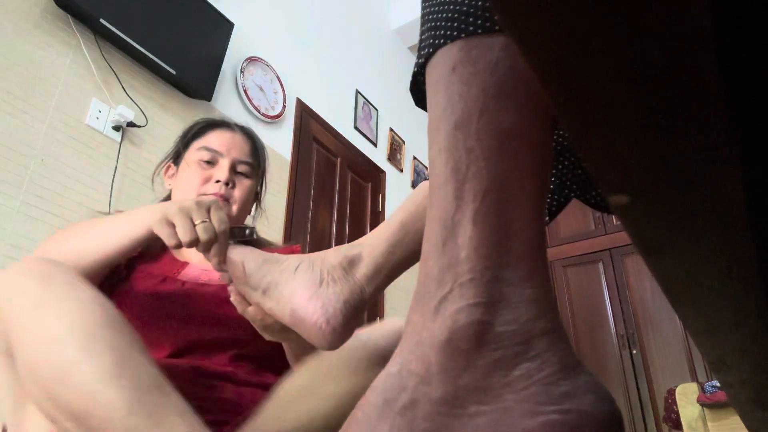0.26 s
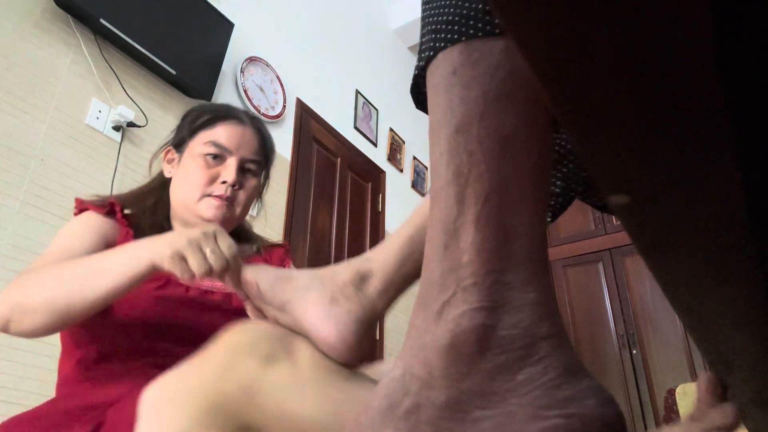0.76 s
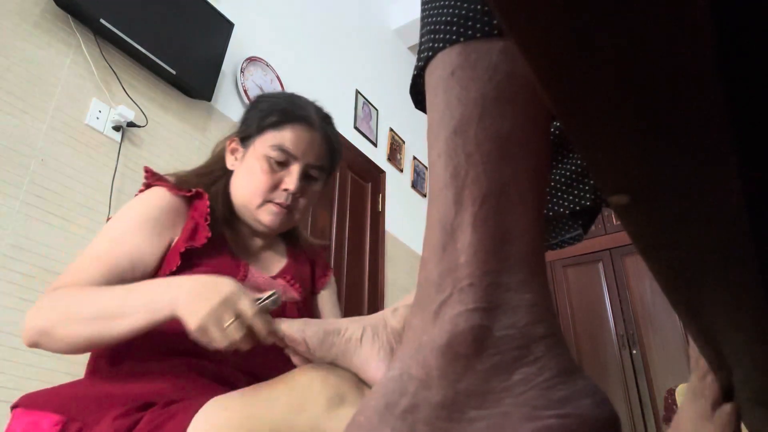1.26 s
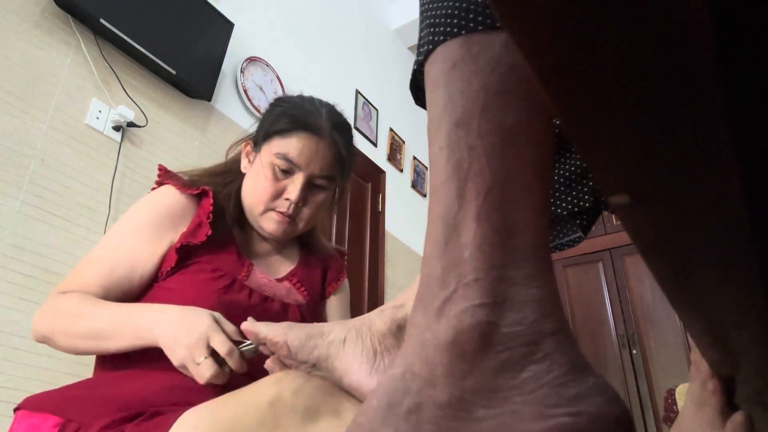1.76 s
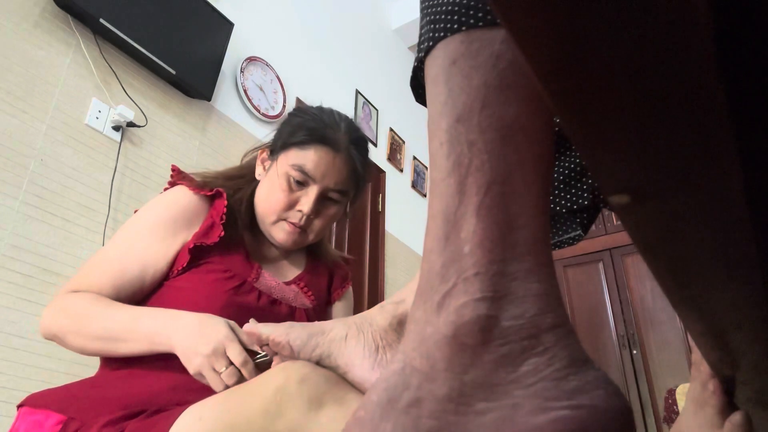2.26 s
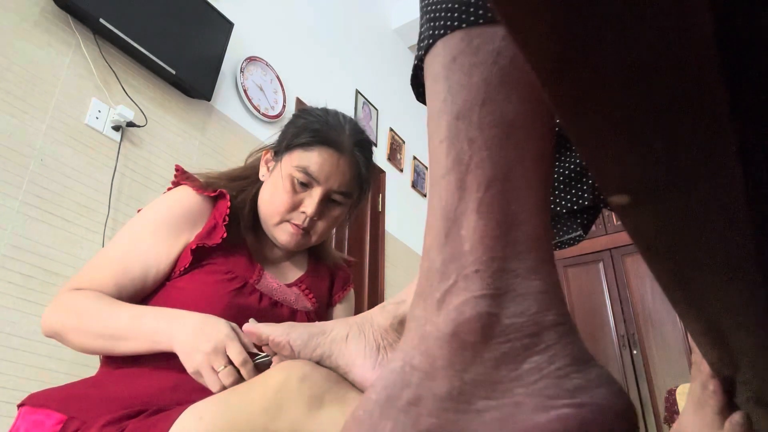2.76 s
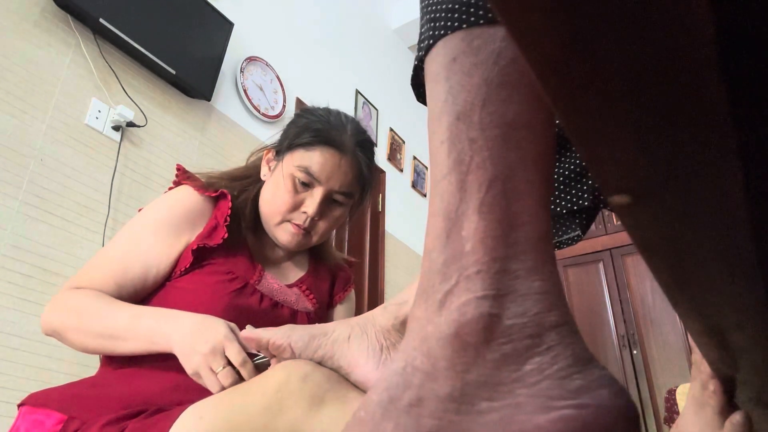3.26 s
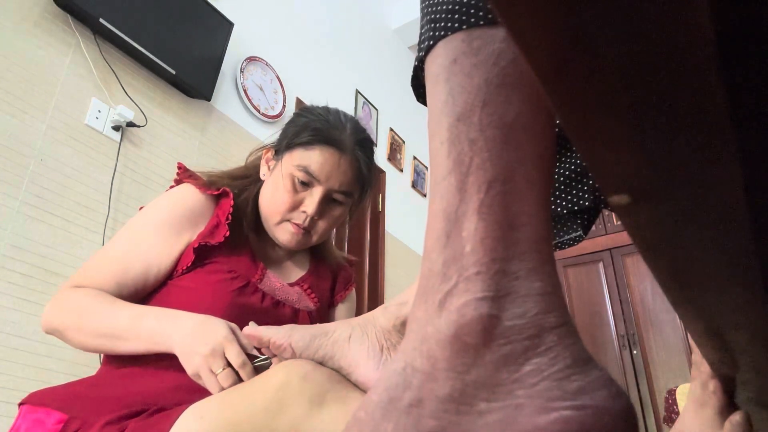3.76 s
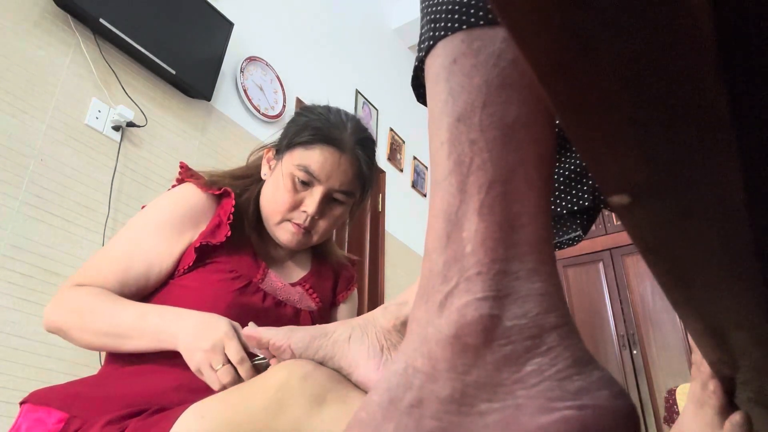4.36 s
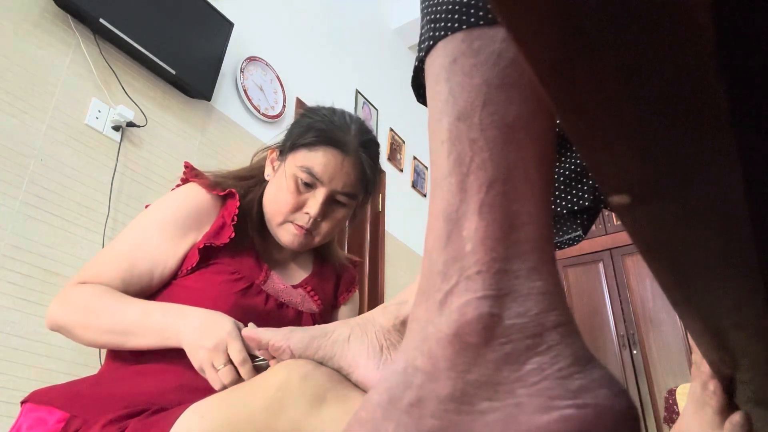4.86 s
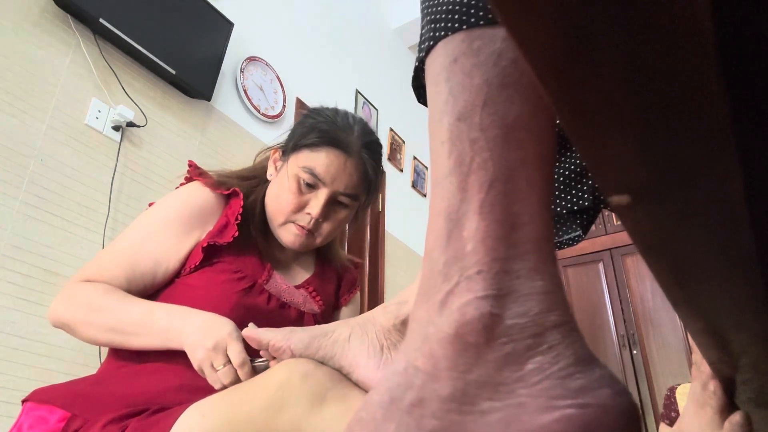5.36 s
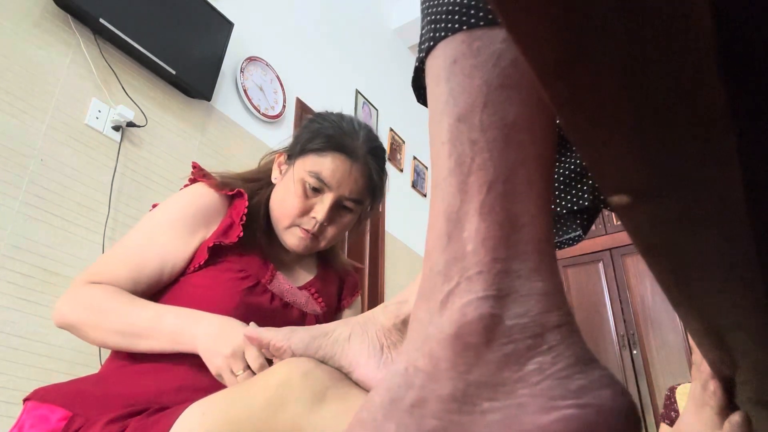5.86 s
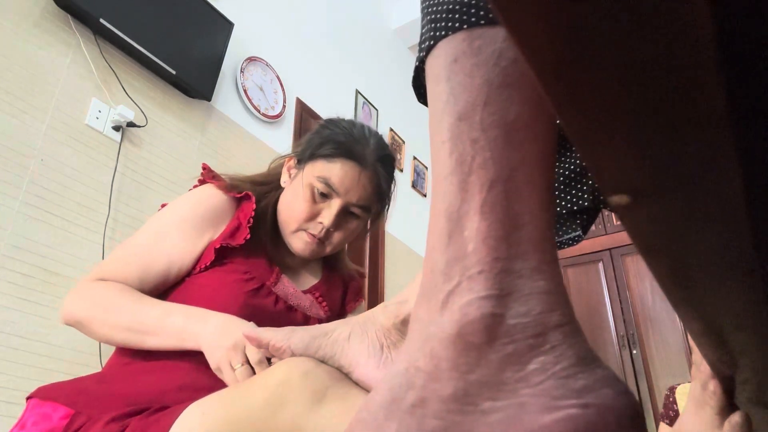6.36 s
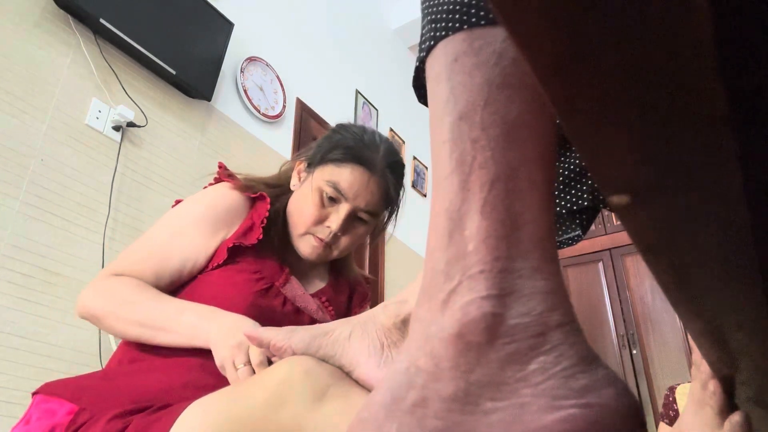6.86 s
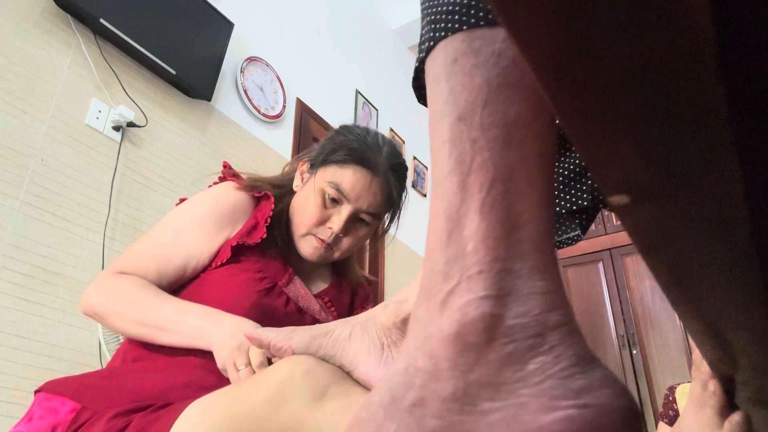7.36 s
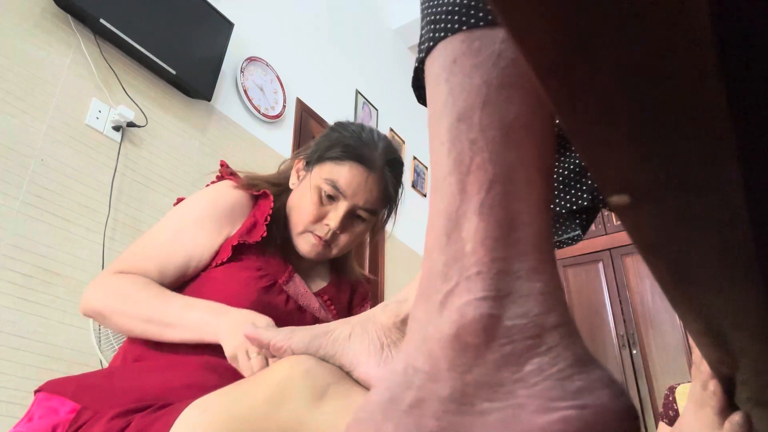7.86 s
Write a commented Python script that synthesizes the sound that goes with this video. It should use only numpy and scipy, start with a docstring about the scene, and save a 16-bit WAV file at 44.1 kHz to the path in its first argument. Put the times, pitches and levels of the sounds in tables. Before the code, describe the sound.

Cloth rustles briefly over a quiet fan and far traffic drone; later a single hard, high metallic toenail snip cracks, with a short bright echo.

```python
"""Toenail clipping in a tiled room

One snap: the clipper snip is a set of decaying modes, the nail cracks as a noise burst, the ring returns
once, faintly, and the room echoes as decaying noise. A fan hums (wavering sines) and blows (shaped noise);
far engines drone through the walls (gliding sines). A dress rustles at first, lifting the treble; one tiny
tick. A limiter ducks the snap, and the echo follows."""
import sys
import numpy as np
from scipy import signal
from scipy.fft import rfft, irfft, next_fast_len
from scipy.io import wavfile
from scipy.ndimage import uniform_filter1d, minimum_filter1d

SR = 44100
rng = np.random.default_rng(int(sys.argv[2]) if len(sys.argv) > 2 else 0)


def put_to_file(sound):
    """Save the sound as 16-bit audio at rate SR, in the file named by the first command-line argument."""
    columns = np.atleast_2d(sound).T  # one column per channel
    safe = np.clip(columns, -1, 1)
    whole_steps = np.round(safe * 32767)
    wavfile.write(sys.argv[1], SR, whole_steps.astype(np.int16))


N = 357410
T = np.arange(N) / SR  # s
M = 2 * next_fast_len(N // 2 + 1)  # FFT length
F = np.maximum(np.arange(M // 2 + 1) * SR / M, 1)  # Hz
SIDES = np.array([[1], [-1]])  # left, right

# port likeness of noise: f/Hz, likeness (0-1)
PORT_LIKENESS = [(60, .88), (200, .7), (320, .75), (500, .3), (1200, .55), (2500, .5), (4500, .25),
                 (6000, .6), (7800, .82), (11400, .62), (11900, 1)]
# port phase: f/Hz, left lead/rad
PORT_LEAD = [(60, .3), (400, .5), (600, 1.5), (1290, 2.3), (1720, 1.8), (2600, 3.1), (4000, 5.5),
             (7000, 9.4), (11400, 11.5), (11900, 4 * np.pi)]
# port balance: f/Hz, left minus right/dB
PORT_PAN = [(60, -3.5), (110, 1), (200, 0), (380, 1.5), (700, -3.5), (1290, 1.5), (2380, 0), (4400, -3),
            (8120, 5), (15000, -3)]

# truck level through the walls: t/s, firing-rate level/dB, second-multiple level/dB
TRUCK_LEVEL = [(0, -51, -51), (3.3, -49, -56), (4.15, -47, -53), (4.45, -37.5, -50.5), (5.1, -33.5, -52),
               (5.65, -35, -49.5), (6.1, -40.5, -44.5), (6.5, -39.5, -44), (6.65, -48, -43),
               (7.3, -53, -49), (7.47, -45, -56), (7.8, -36, -53), (8.1, -32, -49)]
IDLE_HZ, PULL_AWAY_S, CLIMB_HZ_PER_S = 57.7, 3.5, 1.6
# other far engine tones: middle t/s, length/s (between -6 dB points), f/Hz, glide/(Hz/s), peak level/dB
ENGINE_SWELLS = [(.531, .45, 77.5, 3, -45), (.941, .35, 81, 8, -40.5), (.401, .56, 155, 6, -54),
                 (2.161, .42, 46, 0, -47), (2.75, .9, 98, 0, -49), (2.841, 1.9, 160.8, 0, -47),
                 (.551, .8, 216.5, .5, -55), (5.301, 1.2, 215.5, 0, -56), (6.101, .4, 216.5, 0, -52),
                 (6.721, .45, 216.5, -.5, -52), (7.831, .74, 216, .5, -51.5), (.2, .3, 433, 0, -58),
                 (.8, .35, 433, 0, -57), (1.15, .15, 433, 0, -57), (6.021, .1, 433, 0, -53),
                 (6.281, .36, 433, 0, -54), (6.801, .26, 432, -1, -54.5), (7.201, .22, 433, -.5, -50),
                 (7.951, .3, 432, -2, -54)]
SWELL_EDGE = 2.6  # exponent: steepness of both fades

# fan motor lines: f/Hz, level/dB, left minus right/dB, left lead/rad
MOTOR_LINES = [(99.97, -50.5, -4, 0.34), (199.7, -63, -8, 1.2), (270.3, -64, 16, 0.46),
               (284.2, -54, 2, 0.23), (301.4, -56.5, -5, 0.38), (319.1, -49, 8.5, 0.73),
               (550, -66.5, -4.5, 1.9), (592.4, -65, -11.5, 1.7)]
# scale of the random level walk: lines to 310 Hz, 310-400 Hz (the strongest), above 400 Hz
LOW_WAVER_DB, FIRM_WAVER_DB, HIGH_WAVER_DB = 1.96, 0.9, 4
HUM_DRIFT_RATIO = .002  # scale of the random pitch walk
HUM_SWELL_SHARE = 2.56  # share of the lull in the 250-310 Hz lines

# fan air spectrum, relative: f/Hz, density/dB
AIR_SPECTRUM = [(20, -30), (32, -18), (48, -2.5), (100, -5), (130, -10.5), (170, -10), (210, -9.5),
                (247, -16), (290, -13), (340, -15), (600, -19.5), (900, -21), (1300, -22.5), (1650, -28),
                (1950, -31), (2500, -33.5), (3400, -36.5), (4500, -44), (6500, -41), (8200, -44),
                (10000, -46.5), (12200, -43.5), (15700, -50)]
# traffic rumble, applied relative to its median: t/s, level/dB
RUMBLE_LEVEL = [(0, -56), (.8, -54), (1.7, -53), (2.2, -53), (4.2, -55), (5.05, -48), (6.7, -51.5),
                (7.1, -44), (8.1, -51)]
AIR_DB, AIR_TOP_HZ = -42.5, 15720
RUMBLE_HZ, RUSH_HZ, TREBLE_HZ = 55, 490, 2310  # band edges
LULL_S, SINK_DB_PER_S, GROW_DB_PER_S = 3.1, 0.35, 0.39
RUSH_SHARE = 0.76  # share of the lull in the middle band
FLICKER_DB = 1.18  # scale of the random level walk

# cloth rustles: t/s, lift/dB (before rise and fade), rise/s, fade/s
CLOTH_RUSTLES = [(0, 7.5, 0.0018, 0.076), (.15, 3.5, 0.011, 0.056), (.39, 3, .015, 0.067),
                 (.6, 4.5, 0.038, 0.17), (.97, 0, .01, .05)]
RUSTLE_HZ, RUSTLE_TOP_HZ = 1710, 7500  # upper edge of the lifted middle part, edge of the top band
RUSTLE_LOW_SHARE, RUSTLE_MID_SHARE, RUSTLE_TOP_SHARE = 0.7, 0.89, 0.93  # share of the lift per band

TICK_S, TICK_DB, TICK_HZ, TICK_FADE_S = 0.021, -34.5, 9000, 0.0009

# echo spectrum off tiles and plaster, relative: f/Hz, density/dB
ECHO_SPECTRUM = [(1500, -45), (2200, -20), (2700, -35), (3300, -25), (3900, -21), (4600, -28),
                 (5500, -27.5), (6900, -31), (7700, -10.5), (9000, -16.5), (10400, -14), (12300, -6.5),
                 (13100, -6), (13800, 4.5), (14400, -9), (14700, -25), (15000, -58)]
# echo likeness at the ports: f/Hz, likeness (-1 to 1)
ECHO_PORT_LIKENESS = [(2600, .6), (3600, .4), (4500, -.2), (5500, .6), (6900, .97), (9000, .9), (11000, .6),
                      (12000, .68), (12800, .88), (13500, .99)]
ECHO_DELAY_S, ECHO_DB = .011, -27.5
ECHO_SPLIT_HZ, ECHO_T60_LOW_S, ECHO_T60_HIGH_S = 10000, 0.59, 0.45
SCATTER_DB, SCATTER_DELAY_S, SCATTER_FADE_S = 4, .001, .008  # foot and floor; dB relative to the echo
FILL_LOW, FILL_HIGH, FILL_S = .15, .55, .05  # part missing at first, fill-in time
RETURN_DB, RETURN_HZ = -22, 14600  # single return of the ring, low-pass

CRACK_DB, CRACK_LOW_HZ, CRACK_HIGH_HZ = -32.5, 800, 7000
CRACK_FADE_S, CRACK_LAG_S = .0012, 5e-5  # lag of the right port

# ringing modes of the snip, jaws and microphone together:
# f/Hz, level/dB (relative to the blow), T60/s, left lead/rad
SNIP_MODES = [(13250, -6, .0045, .5), (13700, 2, .0042, .4), (14200, -6, .0045, .3),
              (12000, -14, .003, 1.2), (11000, -22, .005, 1.5), (10200, -18, .0035, 1.8),
              (9200, -17, .0035, 2.2), (8450, -15, .0055, 2.4), (7450, -26, .007, 2.),
              (2190, -36, .014, .3), (4500, -37, .004, 2.4), (1500, -39, .004, .2), (15900, -23, .003, .3)]
SNIP_S, SNIP_DB, SNIP_RISE_S, SNIP_PAN_DB = 5.2642, 10.5, .00036, 1

LIMIT_DB, LIMIT_RATIO, LIMIT_RELEASE_S, LIMIT_HOLD_SAMPLES = -20, 1.6, .0012, 265
MONO_HZ, TOP_HZ = 13600, 16800  # sides fold together, top is cut


def undb(db):
    """Decibels to gain."""
    return 10 ** (np.asarray(db) / 20)


def along(table, hz=F):
    """Interpolate a (Hz, value) table on a log-frequency axis."""
    at, value = np.transpose(table)
    return np.interp(np.log(hz), np.log(np.maximum(at, 1)), value)


def low_pass(hz, order):
    """Smooth gain over F, falling above hz."""
    return 1 / (1 + (F / hz) ** order)


def high_pass(hz, order):
    """Smooth gain over F, falling below hz."""
    return 1 / (1 + (hz / F) ** order)


def walk(rate_hz):
    """Random levels held 1 / rate_hz and slewed twice."""
    k = int(SR / rate_hz)
    steps = np.repeat(rng.standard_normal(N // k + 1), k)
    return uniform_filter1d(uniform_filter1d(steps, k), k)[:N]


def wave(spectrum):
    """Spectrum back to samples."""
    return irfft(spectrum, M)[..., :N]


def noise(shape, alike, lead_rad=None):
    """Spectra of coloured noise at both ports, partly shared and phase-shifted; joint rms 1."""
    lead_rad = along(PORT_LEAD) if lead_rad is None else lead_rad
    alike = np.clip(alike, -1, 1)
    left, other = rfft(rng.standard_normal((2, M)))
    right = alike * left * np.exp(-1j * lead_rad) + np.sqrt(1 - alike ** 2) * other
    pair = np.array([left, right]) * shape * undb(SIDES * along(PORT_PAN) / 2)
    return pair / np.sqrt(np.mean(wave(pair) ** 2))


def tone(hz, db, pan_db, lead_rad):
    """Sine of given rms level at both ports, random start phase."""
    phase = 2 * np.pi * (np.cumsum(hz * np.ones(N)) / SR + rng.random())
    return np.sqrt(2) * undb(db + SIDES * pan_db / 2) * np.sin(phase + SIDES * lead_rad / 2)


def truck():
    """Far truck: firing rate idles, then climbs steadily; second multiple follows, both unsteady."""
    s, db, second_db = np.transpose(TRUCK_LEVEL)
    hz = IDLE_HZ + CLIMB_HZ_PER_S * np.maximum(T - PULL_AWAY_S, 0)
    hz = hz * (1 + 0.0027 * walk(6))
    out = 0
    for k, level_db in enumerate((db, second_db), 1):
        unsteady_db = np.interp(T, s, level_db) + 0.43 * walk(6.9)
        out = out + tone(k * hz, unsteady_db, 2.4, k * 0.35)
    return out


def swells():
    """Other far engines: each gliding tone rises, holds unsteadily and sinks."""
    out = 0
    for s, length_s, hz, glide, db in ENGINE_SWELLS:
        fade_db = -6 * np.minimum(np.abs(2 * (T - s) / length_s), 4) ** SWELL_EDGE
        pitch = hz + glide * np.clip(T - s, -length_s, length_s)
        pitch = pitch * (1 + 0.0019 * walk(6.02))
        waver_db = (3.5 if hz > 400 else .7) * walk(9.6)
        out = out + tone(pitch, db + fade_db + waver_db, 1.7, hz * 0.0026)
    return out


def lull_db():
    """Fan level sinks steadily to a low, then grows."""
    return np.maximum(SINK_DB_PER_S * (LULL_S - T), GROW_DB_PER_S * (T - LULL_S))


def hum():
    """Fan motor: mains multiples and shaft sidebands, each wavering in level and pitch."""
    out = 0
    for hz, db, pan_db, lead_rad in MOTOR_LINES:
        if hz > 400:
            waver_db = HIGH_WAVER_DB * walk(9)
        else:
            waver_db = (FIRM_WAVER_DB if hz > 310 else LOW_WAVER_DB) * walk(3.065)
        swell_db = HUM_SWELL_SHARE * lull_db() * (250 < hz < 310)
        pitch = hz * (1 + HUM_DRIFT_RATIO * walk(4))
        out = out + tone(pitch, db + waver_db + swell_db, pan_db, lead_rad)
    return out


def rustle_db():
    """Cloth rubbing: brief lifts, each with exponential rise and fade."""
    total_db = 0
    for s, db, rise_s, fade_s in CLOTH_RUSTLES:
        rise = (T >= s) * (1 - np.exp(-np.abs(T - s) / rise_s))
        total_db = total_db + db * rise * np.exp(-np.maximum(T - s, 0) / fade_s)
    return total_db


def air():
    """Fan breath, traffic rumble and cloth: one broadband noise, its bands moving in level."""
    pair = noise(undb(along(AIR_SPECTRUM)) * (F < AIR_TOP_HZ), along(PORT_LIKENESS)) * undb(AIR_DB)
    low, upper, high = low_pass(RUMBLE_HZ, 6), high_pass(RUSH_HZ, 4), high_pass(TREBLE_HZ, 4)
    lifted, top = low_pass(RUSTLE_HZ, 6), high_pass(RUSTLE_TOP_HZ, 4)

    s, db = np.transpose(RUMBLE_LEVEL)
    rumble = undb(np.interp(T, s, db - np.median(db))) * wave(pair * low)
    steady = wave(pair * (1 - low - upper))

    swell_db, lift_db = lull_db(), rustle_db()
    middle = pair * (upper - high)
    # middle part above RUSTLE_HZ left unlifted
    rush = wave(middle * (1 - lifted)) + undb(RUSTLE_LOW_SHARE * lift_db) * wave(middle * lifted)
    rush = undb(RUSH_SHARE * swell_db + FLICKER_DB * walk(5)) * rush

    treble = 0
    for band, share in ((1 - top, RUSTLE_MID_SHARE), (top, RUSTLE_TOP_SHARE)):
        level_db = swell_db + share * lift_db + FLICKER_DB * walk(9)
        treble = treble + undb(level_db) * wave(pair * high * band)
    return rumble + steady + rush + treble


def tick():
    """Very short treble noise burst, decaying exponentially."""
    burst = wave(noise((F < AIR_TOP_HZ) * high_pass(TICK_HZ, 8), along(PORT_LIKENESS)))
    return undb(TICK_DB) * burst * (T >= TICK_S) * np.exp(-np.maximum(T - TICK_S, 0) / TICK_FADE_S)


def echo():
    """Room: early scatter, then dense reflections from the first wall on; the treble dies sooner."""
    pair = noise(undb(along(ECHO_SPECTRUM)), along(ECHO_PORT_LIKENESS))
    t = np.maximum(T - SNIP_S - ECHO_DELAY_S, 0)
    before_wall = (T > SNIP_S + SCATTER_DELAY_S) * (t == 0)
    scatter = undb(SCATTER_DB) * before_wall * np.exp(-np.abs(T - SNIP_S) / SCATTER_FADE_S)
    low = low_pass(ECHO_SPLIT_HZ, 6)
    out = 0
    for band, t60_s, fill in ((low, ECHO_T60_LOW_S, FILL_LOW), (1 - low, ECHO_T60_HIGH_S, FILL_HIGH)):
        build_up = scatter + (t > 0) * (1 - fill * np.exp(-t / FILL_S))
        out = out + build_up * wave(pair * band) * undb(-60 * t / t60_s)
    return undb(ECHO_DB) * out


def ring_return():
    """Jaw ring returns once, faintly, low-passed."""
    return wave(rfft(snip(SNIP_S + ECHO_DELAY_S, RETURN_DB), M) * low_pass(RETURN_HZ, 40))


def crack():
    """Nail tearing: milliseconds of rough broad noise, slightly earlier at the left port."""
    t = np.maximum(T - SNIP_S, 0)
    shape = low_pass(CRACK_HIGH_HZ, 4) * high_pass(CRACK_LOW_HZ, 4)
    burst = wave(noise(shape, 0.73, 2 * np.pi * F * CRACK_LAG_S))
    return undb(CRACK_DB) * burst * t / CRACK_FADE_S * np.exp(1 - t / CRACK_FADE_S)


def snip(s, blow_db):
    """Jaws slam shut: every mode grows while the nail tears, then decays."""
    part = slice(int(s * SR), int(s * SR) + 2000)
    t = np.maximum(T - s, 0)[part]
    out = np.zeros((2, N))
    for hz, db, t60_s, lead_rad in SNIP_MODES:
        fade = np.exp(-np.log(1000) * t / t60_s) * (1 - np.exp(-(t / SNIP_RISE_S) ** 2))
        phase = 2 * np.pi * hz * (t - SNIP_RISE_S) + SIDES * lead_rad / 2
        out[:, part] += undb(blow_db + db + SIDES * SNIP_PAN_DB / 2) * fade * np.sin(phase)
    return out


def scene():
    """Snap and echo over fan and engines."""
    background = truck() + swells() + hum() + air() + tick()
    return background + echo() + ring_return() + crack() + snip(SNIP_S, SNIP_DB)


def record(dry):
    """Look-ahead limiter, soft knee, both sides alike; the top is folded to mono and cut."""
    over = np.log(np.maximum(np.abs(dry).max(axis=0) / undb(LIMIT_DB), 1e-9))
    # hold each peak
    over = -minimum_filter1d(-over, size=LIMIT_HOLD_SAMPLES, origin=LIMIT_HOLD_SAMPLES // 2)
    # the envelope falls by a factor e each release time
    k = np.arange(N) / (LIMIT_RELEASE_S * SR)
    held = np.maximum.accumulate(over + k) - k
    gain = np.exp(-(1 - 1 / LIMIT_RATIO) * np.log1p(np.exp(held)))
    # centred windows: gain drops ahead of the peak
    gain = minimum_filter1d(gain, size=120)
    gain = uniform_filter1d(uniform_filter1d(gain, size=60), size=60)
    mid, side = (dry[0] + dry[1]) / 2, (dry[0] - dry[1]) / 2
    side = wave(rfft(side, M) * low_pass(MONO_HZ, 60))
    top_cut = signal.ellip(8, .2, 70, TOP_HZ, fs=SR, output="sos")
    return signal.sosfilt(top_cut, (mid + SIDES * side) * gain)


dry = scene()
out = record(dry)
put_to_file(out)
```